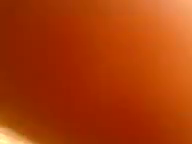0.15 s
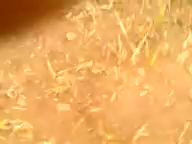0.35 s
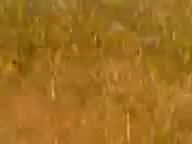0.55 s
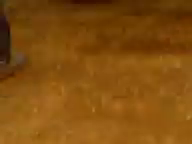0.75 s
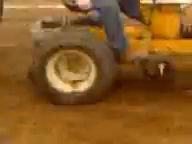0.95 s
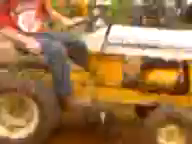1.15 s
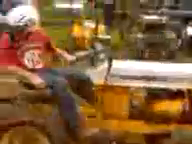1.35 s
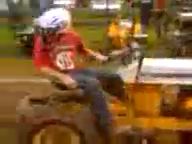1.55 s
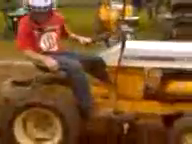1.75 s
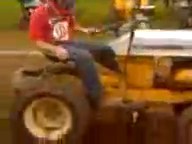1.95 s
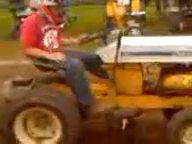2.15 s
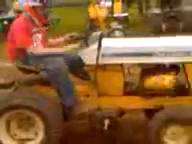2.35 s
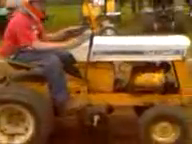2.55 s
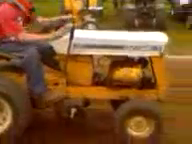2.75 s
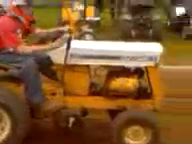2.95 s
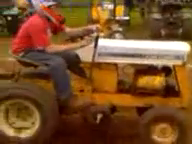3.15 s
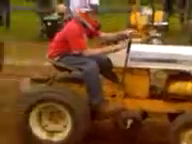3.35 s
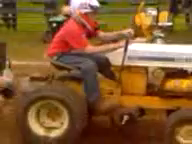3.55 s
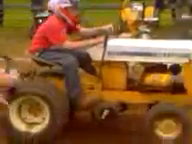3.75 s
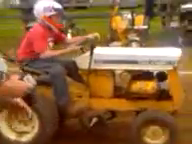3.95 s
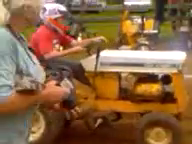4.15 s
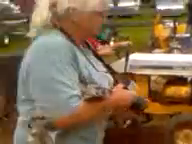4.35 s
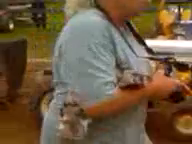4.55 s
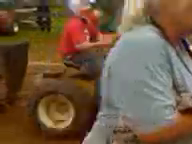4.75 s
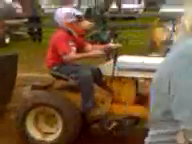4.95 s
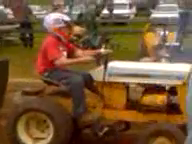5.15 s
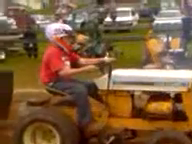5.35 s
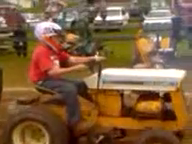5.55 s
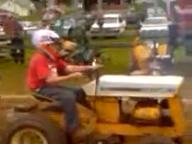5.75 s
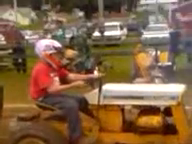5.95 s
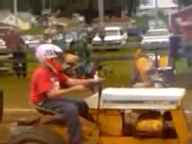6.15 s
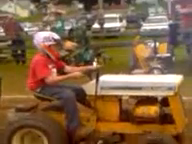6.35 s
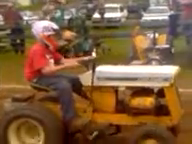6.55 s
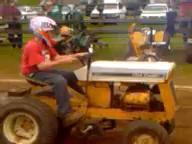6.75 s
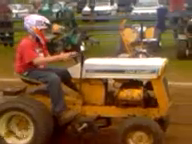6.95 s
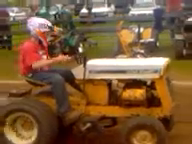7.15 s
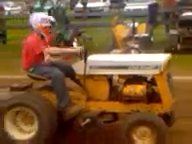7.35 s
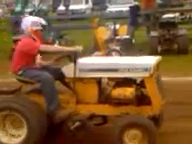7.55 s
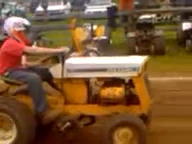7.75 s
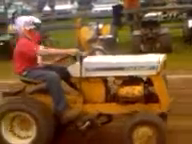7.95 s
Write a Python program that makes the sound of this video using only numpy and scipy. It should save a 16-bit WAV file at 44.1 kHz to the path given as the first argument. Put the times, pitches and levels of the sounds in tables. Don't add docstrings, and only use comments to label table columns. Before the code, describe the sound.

A small single-cylinder tractor chuffs at idle, its hitch chain clanks tight, then the throttle opens into a harsh, cracking, sustained roar under load.

```python
import sys
import numpy as np
from scipy import signal
from scipy.fft import rfft, irfft, next_fast_len
from scipy.io import wavfile
from scipy.ndimage import uniform_filter1d, map_coordinates

SR = 44100
rng = np.random.default_rng(int(sys.argv[2]) if len(sys.argv) > 2 else 0)


def log_audio(samples):
    frames = np.atleast_2d(samples).T
    limited = np.clip(frames, -1, 1)
    pcm = np.round(limited * 32767).astype(np.int16)
    wavfile.write(sys.argv[1], SR, pcm)


def ratio(d):
    e = np.asarray(d, float) / 20
    return 10 ** e


N = 356769

# (time [s], firing rate [1/s])
FIRING_RATE = [(0, 13.37), (.35, 13.39), (.7, 13.04), (1.05, 12.18), (1.4, 12.29), (1.75, 12.68),
               (2.1, 12.7), (2.45, 13.24), (2.8, 13.17), (3.1, 13.06), (3.35, 14.22), (3.55, 16.37),
               (3.8, 19.87), (4.3, 27.3), (4.55, 29.47), (4.9, 32), (5.7, 35), (8.1, 37)]
# (time [s], share [0-1])
BLAST_SHARE = [(0, 0.2), (1, 0.4), (3.3, .4), (3.39, 0.71), (3.75, .75), (4, 0.2), (4.5, .75), (4.7, 0.2),
               (5.1, 0), (8.1, 0)]
# (time [s], level at the stack [dB], low bellow at the microphone [dB])
ENGINE_EFFORT = [(0, -45.5, -41), (.25, -36, -41.5), (.6, -37, -43.5), (1, -34.5, -46), (2.45, -38, -45.5),
                 (2.8, -36, -47.5), (3.37, -35, -44.5), (3.4, -27, -41.5), (3.7, -23.5, -42),
                 (3.85, -20, -39.5), (4.35, -24, -36.5), (4.85, -19.5, -31), (5.2, -20, -33),
                 (5.68, -18, -32), (5.88, -16.5, -31), (6.5, -18, -34), (7.2, -14.5, -34.5),
                 (8.09, -15.5, -35.5)]
# (time [s], half length [s], stack [dB], hood [dB])
ROAR_SURGES = [(-0.006, 0.046, 6, 11.5), (.08, 0.013, -5, 6.5), (0.214, 0.055, 4, 4.5),
               (1.252, 0.064, 0, 4), (2.626, 0.023, -4, 5), (2.89, 0.073, 1, 3), (3.809, 0.01, 3.5, -4.5),
               (4.433, 0.025, 3.5, -5), (5.152, 0.11, 1.5, -2), (5.358, .06, -0.5, 3.5), (6.03, .03, -5, 0),
               (6.094, 0.022, 4.5, 4.5), (6.55, 0.022, 0, -1.5), (5.662, 0.056, -4, -2),
               (5.93, 0.054, -0.5, -3.5), (7.107, 0.069, -.3, 2)]


def unit(x):
    return x / np.sqrt(np.mean(x ** 2) + 1e-20)


def along(points, hz):
    f, v = np.transpose(points)
    return np.interp(np.log(hz + 1), np.log(f + 1), v)


def curves(rows):
    s, *columns = np.transpose(rows)
    return [np.interp(np.arange(N) / SR, s, column) for column in columns]


def bump(s, half):
    return np.exp(-((np.arange(N) / SR - s) / half) ** 2)


def wobble(rate):
    at = np.arange(0, N + 16, 16)
    knots = rng.standard_normal(int(N * rate / SR) + 4)
    return np.interp(np.arange(N), at, map_coordinates(knots, [at * rate / SR]))


def throttle(idle, loaded):
    opens_s, opening_s = 3.38, 0.045
    load = (1 + np.tanh((np.arange(N) / SR - opens_s) / opening_s)) / 2
    return idle + (loaded - idle) * load


def filtered(x, response):
    m = next_fast_len(N + SR // 2)
    return irfft(rfft(x, m) * response(np.fft.rfftfreq(m, 1 / SR)), m)[..., :N]


def resonance(idle_hz, load_hz, idle_db, load_db, wander_hz, width_hz, sag_hz=0):
    centre_hz = throttle(idle_hz, load_hz) - sag_hz + wander_hz * wobble(11)
    return centre_hz, width_hz, throttle(idle_db, load_db) + 1.4 * wobble(9)


def patchy(depth_db, peaks=()):
    hz, t, z = signal.stft(rng.standard_normal(N), SR, nperseg=512)
    field = uniform_filter1d(rng.standard_normal(z.shape), size=3, axis=0)
    field = uniform_filter1d(field, size=9, axis=1)
    at = np.minimum(t * SR, N - 1).astype(int)
    lift_db = 0
    for centre, width, db in peaks:
        lift_db = lift_db + db[at] / (1 + ((hz[:, None] - centre[at]) / width) ** 2)
    return signal.istft(z * ratio(depth_db * unit(field) + lift_db), nperseg=512)[1][:N]


def firings(scatter_s, size_db, second_turn, second_db):
    first_turn = 1.08
    turns = first_turn + np.cumsum(curves(FIRING_RATE)[0]) / SR
    chance = rng.standard_normal((int(turns[-1]) + 2, 4))
    trains = np.zeros((2, N))
    for k, (late, db) in enumerate([(0, 0), (second_turn, second_db)]):
        at = np.flatnonzero(np.diff(np.floor(turns - late)))
        timing, strength = chance[:len(at), 2 * k:2 * k + 2].T
        at = at + (scatter_s * SR * timing).astype(int)
        trains[k, np.clip(at, 0, N - 1)] = ratio(db + size_db * strength)
    return trains


def gas(train, share, spectrum, lead_s, rise_s, fall_s, crackle_db, crackle_rate, noise):
    t = np.arange(SR // 8) / SR
    blast = (1 - np.exp(-t / rise_s)) * np.exp(-t / fall_s)
    beat = np.abs(signal.fftconvolve(train, blast ** 2)[:N])
    beat = np.roll(beat, -round(lead_s * SR))
    beat /= uniform_filter1d(beat, size=SR // 4) + 1e-9
    share = np.clip(share, 0, 1)
    flow = np.sqrt(1 - share + share * beat) * ratio(crackle_db * wobble(crackle_rate))
    sound = filtered(flow * noise, lambda hz: ratio(along(spectrum, hz)))
    return sound / np.sqrt(np.abs(uniform_filter1d(sound ** 2, size=SR // 3)) + 1e-12)


def stack_roar(train):
    # (frequency [Hz], density [dB per Hz])
    rasp_spectrum = [(880, -31), (1500, -11.5), (1720, -24), (2110, -3), (2940, -3), (3470, -4.5),
                     (4220, -39.5), (4590, -34.5), (5970, -79), (10100, -120)]
    hiss_spectrum = [(3300, -120), (3600, -11.5), (3900, 2.5), (4300, -6), (4700, -11), (5000, -120)]
    # (idle [Hz], loaded [Hz], idle lift [dB], loaded lift [dB], wander [Hz], width [Hz])
    low_whistle = (2005, 2300, 10, 2.5, 78, 79)
    high_whistle = (3200, 2935, 2.1, 7.3, 78, 230)
    # (time [s], half length [s], sag [Hz])
    sags = [
        (.55, 0.12, 550),
        (2.946, 0.32, 503),
        (4.55, 0.55, 187.7),
        (7.3, 0.18, 119),
    ]
    sag_hz = sum(hz * bump(s, half) for s, half, hz in sags)
    whistles = [resonance(*low_whistle), resonance(*high_whistle, sag_hz)]
    rasp = gas(train, curves(BLAST_SHARE)[0], rasp_spectrum, lead_s=0.00088, rise_s=0.0079, fall_s=0.015,
               crackle_db=throttle(1.0, 1.2), crackle_rate=380, noise=patchy(1.98, whistles))
    hiss = gas(train, throttle(0.93, 0.9), hiss_spectrum, lead_s=-0.002, rise_s=0.0056, fall_s=0.016,
               crackle_db=1.0, crackle_rate=210, noise=patchy(1.5))
    hiss_db = throttle(-24.5, -27.5)
    roar_db = curves(ENGINE_EFFORT)[0] + 0.27 * wobble(6.5)
    roar_db += sum(db * bump(s, half) for s, half, db, _ in ROAR_SURGES)
    return ratio(roar_db - 1.01) * (rasp + ratio(hiss_db) * hiss)


def hood_drone(train):
    # (frequency [Hz], density [dB per Hz])
    drone_spectrum = [(310, -29), (520, -13.5), (818, -2.5), (1030, -2), (1680, -3.5), (1950, 0.5),
                      (2540, -33.5), (4290, -120)]
    # (idle [Hz], loaded [Hz], idle lift [dB], loaded lift [dB], wander [Hz], width [Hz])
    hood = (916, 1088, 3.8, 5.3, 100, 100)
    # (time [s], centre [Hz], lift [dB])
    ground = [(.24, 1820, -2), (.3, 1620, -9.5), (.55, 1150, -13), (.75, 796, -7), (.9, 743, 1.4)]
    notch_hz, notch_db = curves(ground)
    ground_width_hz = 290
    noise = patchy(1.9, [resonance(*hood), (notch_hz, ground_width_hz, notch_db)])
    drone = gas(train, 0.92 * curves(BLAST_SHARE)[0], drone_spectrum, lead_s=0.0017, rise_s=0.0028,
                fall_s=0.015, crackle_db=1.5, crackle_rate=220, noise=noise)
    stack_db, bellow_db = curves(ENGINE_EFFORT)
    from_stack = 0.48
    drone_db = from_stack * stack_db + (1 - from_stack) * bellow_db + 0.5
    drone_db += sum(db * bump(s, half) for s, half, _, db in ROAR_SURGES) + 0.43 * wobble(7)
    return ratio(drone_db - 0.86) * drone


def low_thump(train):
    # (frequency [Hz], density [dB per Hz])
    thump_spectrum = [(12, -45.5), (20, -22), (86, -5.5), (170, -6), (282, -2), (528, -2), (700, -1.5),
                      (910, -28.5), (1540, -120)]
    thump = gas(train, throttle(0.55, 0.25), thump_spectrum, lead_s=0.0008, rise_s=0.0071, fall_s=0.016,
                crackle_db=0.5, crackle_rate=97, noise=patchy(1.8))
    thump_db = curves(ENGINE_EFFORT)[1] + 1.4 * wobble(7)
    return ratio(thump_db - 0.5) * thump


def idle_chuff(fire, stroke):
    # (centre [Hz], width [Hz])
    pipes = [
        (245, 94),
        (345, 130),
    ]
    # (time [s], turned away [dB], facing [dB])
    levels = [(0, -42, -57), (.72, -41.5, -54), (.8, -48, -58), (1.3, -51, -58), (2.2, -49, -53),
              (2.6, -51, -53), (3, -52, -47), (3.3, -55, -43), (3.45, -76, -66.5), (8.1, -66, -67)]

    def ring(pulses, delay_s, centre, width):
        late = np.roll(pulses, round(delay_s * SR))
        band = lambda f: 1j * f * width / (centre ** 2 - f ** 2 + 1j * f * width)
        return unit(filtered(late, lambda f: band(f) ** 2))

    away = ring(np.sqrt(fire), 0.007, *pipes[0])
    facing = ring(fire + 3.2 * stroke, 0.003, *pipes[1])
    away_db, facing_db = curves(levels)
    return ratio(away_db) * away + ratio(facing_db) * facing


def engine():
    fire, stroke = firings(scatter_s=0.0012, size_db=1.4, second_turn=0.31, second_db=-9.0)
    train = fire + stroke
    return stack_roar(train) + hood_drone(train) + low_thump(train) + idle_chuff(fire, stroke)


def cracks():
    # (time [s], peak [dB], centre [Hz])
    singles = [(0.152, -27.5, 3040), (0.188, -19.5, 3300), (0.4752, -18, 2650), (0.7065, -21.5, 2460),
               (1.5668, -27, 2070), (1.8786, -25, 2070), (2.5757, -26, 2260), (2.6023, -21, 2560),
               (2.8093, -22, 2770), (3.1288, -19.5, 2590), (3.1866, -19, 2810), (3.2115, -19, 2700),
               (3.416, -18, 2630), (3.505, -17.5, 3140), (3.807, -18.5, 2750), (3.898, -9.5, 2540),
               (3.9533, -5, 2800), (4.054, -13.5, 2740), (4.0738, -7.5, 2880), (4.124, -12, 2620),
               (4.1899, -5.5, 2870), (4.2826, -8.5, 2680), (4.3075, -9, 2700), (4.3864, -19.5, 2740),
               (4.4244, -14, 2660), (6.1024, -10, 3520), (6.9543, -5, 2970)]
    # (time [s], crack [dB], afterclap [dB], centre [Hz])
    barks = [(3.3936, -6, -16, 2630), (3.4593, -8.5, -6.5, 3070), (3.528, -11.5, -11, 3030),
             (3.5868, -6.5, -13, 3020), (3.6434, -11.5, -10.5, 3260), (3.7009, -7.5, -5, 2670)]
    afterclap_turns = 0.21
    events = list(singles)
    for s, db, clap_db, hz in barks:
        turn_s = 1 / np.interp(s, *np.transpose(FIRING_RATE))
        events += [(s, db, hz), (s + afterclap_turns * turn_s, clap_db, hz)]
    out, t = np.zeros(N + SR), np.arange(SR // 40) / SR
    for s, db, hz in events:
        b, a = signal.butter(2, [hz * 0.82, hz * 1.15], "band", fs=SR)
        burst = signal.lfilter(b, a, rng.standard_normal(len(t)) * ratio(-60 * t / 0.028))
        out[round(s * SR):][:len(t)] += ratio(db - 1) * burst / np.abs(burst).max()
    return out[:N]


def howls():
    # (centre time [s], half length [s], rms
    # [dB], pitch [Hz], width [Hz])
    swells = [(0.355, 0.026, -34, 3050, 120), (0.366, 0.062, -36, 2230, 200),
              (1.172, 0.0066, -25.5, 900, 450), (1.205, 0.015, -28, 2000, 300),
              (1.567, 0.0081, -35.5, 1000, 300), (2.601, 0.015, -33.5, 2720, 250),
              (4.202, 0.021, -25, 2730, 200), (4.388, 0.0063, -18.5, 2690, 249),
              (5.053, 0.042, -21, 2417, 110), (5.175, 0.088, -23, 2280, 400), (5.666, 0.1, -29, 2240, 400),
              (6.078, 0.014, -18.5, 2445, 350), (6.104, 0.037, -18, 3460, 334),
              (6.624, 0.029, -20, 2110, 220)]
    t, out = np.arange(-SR // 4, SR // 4) / SR, np.zeros(N + SR)
    for s, half, db, hz, width_hz in swells:
        swell = np.exp(-(t / half) ** 2)
        b, a = signal.butter(2, [hz - width_hz / 2, hz + width_hz / 2], "band", fs=SR)
        band = signal.lfilter(b, a, rng.standard_normal(len(t)))
        band /= np.sqrt(np.average(band ** 2, weights=swell ** 2))
        out[round((s + t[0]) * SR):][:len(t)] += ratio(db) * swell * band
    return out[:N]


def hitch():
    # (time [s], crack peak [dB], ring below it [dB])
    contacts = [
        (1.155, -25, -7),
        (1.1675, -8, -13),
        (1.1703, -8, -13),
        (1.197, -28, -4),
        (1.2045, -19, -9),
        (1.2085, -20, -9),
        (1.22, -29, -3),
    ]
    # (frequency [Hz], level [dB], decay by 60 dB [s])
    steel = [(620, -3, .04), (1077, -4, .07), (1720, -3, .035), (2030, -1, .06), (2600, -4, .035),
             (3120, -3, .035)]
    out, t = np.zeros(N + SR), np.arange(SR // 5) / SR
    b, a = signal.butter(2, [650, 3500], "band", fs=SR)
    for s, db, ring_db in contacts:
        ring = np.zeros(len(t))
        for hz, level, t60 in steel:
            ring += ratio(level + rng.normal(0, 2.7) - 60 * t / t60) * np.sin(2 * np.pi * hz * t)
        crack = signal.lfilter(b, a, ratio(-60 * t / 0.012) * rng.standard_normal(len(t)))
        blow = ratio(ring_db) * ring + crack / np.abs(crack).max()
        out[round(s * SR):][:len(t)] += ratio(db) * blow
    return out[:N]


def scene():
    # (frequency [Hz], level [dB])
    dulling = [(300, -12.5), (600, -2.5), (3400, -0.5), (3800, -11.5), (4200, -25.5), (4700, -18)]
    sharp = filtered(cracks() + hitch(), lambda hz: ratio(along(dulling, hz)))
    return (engine() + sharp + howls())[None]


def band_limit(x):
    return signal.sosfilt(signal.butter(12, 15900, fs=SR, output="sos"), x)


def record(dry):
    # (frequency [Hz], level [dB])
    phone_band = [(20, -1.5), (3900, 0), (4300, -4), (4600, -20), (4750, -53.5), (4900, -120)]
    # (time [s], peak [dB], pitch [Hz])
    overloads = [
        (6.0942, -1, 3200),
        (6.0966, -2.1, 3200),
        (6.1113, -2.35, 3300),
        (6.1155, -2.1, 3300),
        (6.9602, -2.77, 2900),
        (7.6861, -2.74, 3000),
        (7.8409, -2.55, 3000),
        (7.863, -2.25, 3000),
    ]
    soft = dry / (1 + np.abs(dry / 0.62) ** 6) ** (1 / 6)
    band = filtered(soft, lambda hz: ratio(along(phone_band, hz)))
    t = np.arange(N) / SR
    for s, db, hz in overloads:
        swell = bump(s, 0.00055)
        band = band * (1 - swell) + ratio(db) * swell * np.cos(2 * np.pi * hz * (t - s))
    return band_limit(np.clip(band, -0.72, 0.72))


dry = scene()
out = record(dry)
log_audio(out)
```